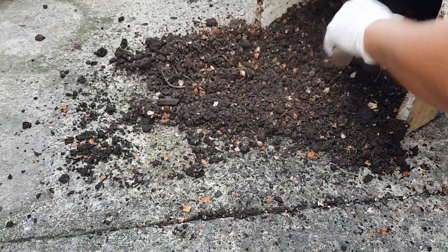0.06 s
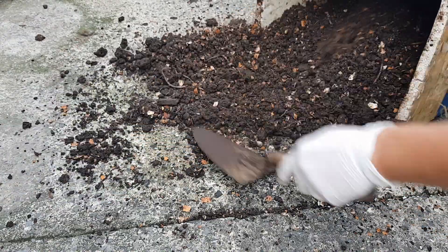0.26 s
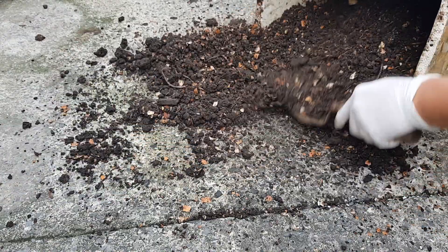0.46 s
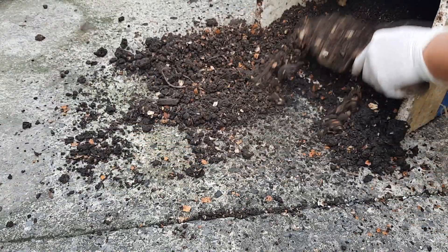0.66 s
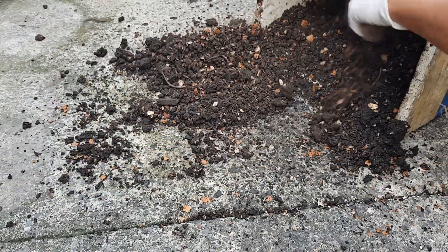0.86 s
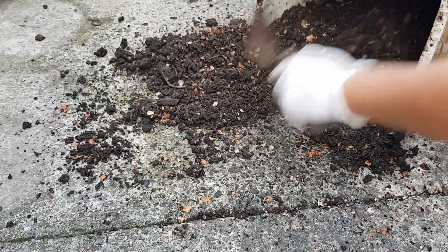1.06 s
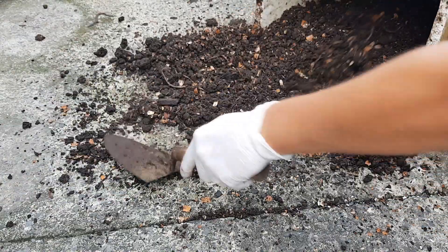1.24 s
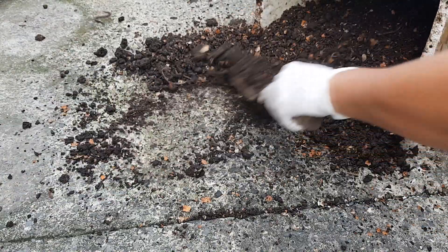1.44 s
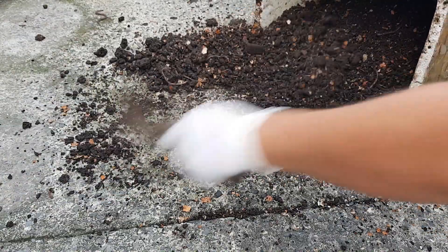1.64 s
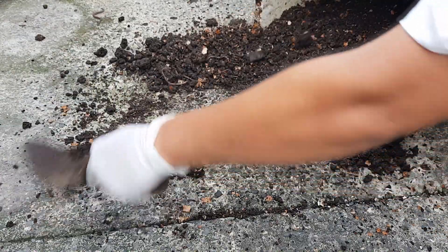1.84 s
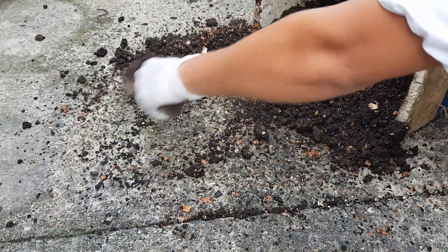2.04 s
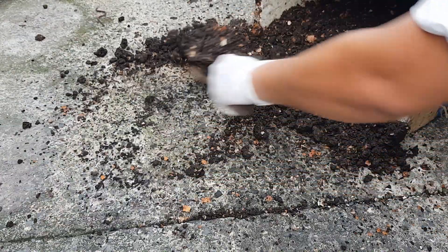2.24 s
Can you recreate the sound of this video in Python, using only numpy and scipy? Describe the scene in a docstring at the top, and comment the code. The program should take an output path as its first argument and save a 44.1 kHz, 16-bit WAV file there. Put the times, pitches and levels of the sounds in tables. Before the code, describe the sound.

Close up outdoors, a metal trowel makes three short, gritty scrapes across concrete, its blade ringing briefly. Scooped soil patters onto a heap slightly to the right, over a low rumble and a very faint distant bird.

```python
"""A small steel trowel scoops crumbly compost off a concrete floor in three strokes.
Grit crunches under the edge, which catches on stones and makes the blade ring. Each load is
tossed onto a heap at the right and lands in soft thuds and trickling crumbs. Hard bits click
on the floor and nearby walls echo, over a faint distant bird and a low outdoor rumble."""
import sys
import numpy as np
from scipy import signal
from scipy.fft import rfft, irfft, next_fast_len
from scipy.io import wavfile
from scipy.ndimage import uniform_filter1d, map_coordinates

SR = 44100
rng = np.random.default_rng(int(sys.argv[2]) if len(sys.argv) > 2 else 0)


def to_wav(sig):
    """Store sig (one row per channel, or 1-D mono) as 16-bit WAV at the path in sys.argv[1].

    Samples outside -1..1 are clipped; the rate is SR.
    """
    pcm = np.clip(np.atleast_2d(sig), -1, 1) * 32767
    pcm = np.round(pcm).astype(np.int16)
    wavfile.write(sys.argv[1], SR, pcm.T)  # frames by channels


N = 101429

# Levels are relative. Pan is left minus right, so a negative pan lies to the right.
# the edge scraping the concrete, one list per stroke (t/s, crunch level/dB, ring level/dB)
STROKES = [
    [(.32, -52, -79), (.341, -36, -33), (.346, -20.5, -24), (.356, -21.5, -23), (.367, -35, -49),
     (.373, -25.5, -22), (.386, -17, -18.5), (.4, -26.5, -25.5), (.414, -26.5, -15), (.43, -29, -42),
     (.475, -32, -47), (.53, -47, -47)],
    [(1.28, -42.5, -25.5), (1.298, -23.5, -26.5), (1.31, -39, -30), (1.321, -34, -20), (1.326, -25.5, -27),
     (1.352, -24.5, -21), (1.366, -24.5, -18.5), (1.381, -20, -24), (1.394, -24, -17.5),
     (1.42, -30.5, -27.5), (1.44, -37.5, -66), (1.47, -59, -74.5)],
    [(1.796, -36.5, -35), (1.818, -37, -34.5), (1.843, -29, -28.5), (1.864, -23, -18), (1.878, -44, -40),
     (1.898, -41.5, -39), (1.904, -29, -23), (1.943, -27, -25.5), (1.952, -20.5, -35), (1.966, -22, -27),
     (1.975, -50, -46), (1.989, -45, -29), (1.998, -24, -29), (2.04, -34, -29), (2.075, -42, -48),
     (2.14, -44, -57), (2.22, -45.5, -62), (2.3, -48.5, -81)],
]
# where each stroke lies (pan/dB, delay of the left ear/ms)
STROKE_PLACES = [(-3, .04), (-2, -.08), (-3.5, -.18)]
# the edge catches on a stone (t/s, crunch level/dB, ring level/dB, fade/s, pan/dB)
CATCHES = [(.217, -54, -39, 0.0064, -18), (.291, -49, -27, 0.021, -7), (0.3428, -21, -19.5, 0.02, -8),
           (0.369, -11, -26, 0.0093, -8), (.403, -12, -3, 0.015, -3.5), (0.426, -24.5, -39, 0.0065, -1.5),
           (.4385, -11.5, -37, 0.0082, -6), (0.4667, -15, -28, 0.012, -8), (1.2798, -21.5, -34, .012, -5.5),
           (1.294, -22.5, -35, 0.004, 4), (1.316, -42.5, -20, .01, 8.5), (1.324, -22, -47, 0.012, -2),
           (1.341, -19.5, -26, 0.014, -6), (1.3678, -13.5, -8.5, 0.0148, -6.5),
           (1.3899, -13.5, -15.5, 0.019, -5.5), (1.412, -19.5, -26, 0.042, -5),
           (1.7937, -33, -34, 0.011, -3.5), (1.858, -18, -26, 0.0057, 9), (1.903, -17, -24, 0.011, 3),
           (1.928, -17.5, -22, .012, 8), (1.946, -27.5, -32, 0.016, -13), (1.994, -23.5, -38, 0.019, -2),
           (2.042, -28, -32, 0.01, -0.5), (2.108, -27.5, -56, 0.05, -5), (2.162, -29, -57, 0.023, -7),
           (2.181, -35.5, -50, .015, 2), (2.205, -31.5, -49, .03, -2), (2.246, -31, -50, 0.026, -4)]
# the tones the blade rings with (f/Hz, level/dB, time to fade by 60 dB/s)
BLADE_TONES = [(1166, -17, 0.061), (1443, -7, 0.0083), (1639, -8, 0.037), (1659.5, -1.5, 0.059),
               (1730.4, 3, 0.037), (1870, -5, 0.015), (2160, -12.5, 0.063), (2333, -17, .05),
               (2953, -20.5, 0.086), (3630, -10.5, 0.032), (4090, -24, 0.047), (4586, -24.5, 0.09),
               (5400, -16, 0.052), (6715, -21, 0.075), (8870, -18, 0.081), (10050, -16, 0.049),
               (12710, -30.5, .025), (14790, -6, 0.0186)]
# tone colour of crunching grit (f/Hz, level/dB)
CRUNCH_COLOUR = [(100, -25.5), (330, -8), (700, -1), (1000, -5), (1400, 2), (2100, 1.5), (2850, 5.5),
                 (3280, -10), (3750, -1), (5000, -3.5), (6700, 0.5), (8000, -5), (10000, 3.5), (13500, 2),
                 (14800, -3.5), (16000, -7)]
# tossed clods land (t/s, thud level/dB, hiss level/dB, rise/s, fade/s)
CLODS = [(0.05, -31.5, -52, 0.0063, 0.2), (0.088, -39, -48, 0.016, 0.17),
         (0.226, -24.5, -62, 0.0044, 0.063), (0.594, -47, -48, 0.0041, 0.052),
         (0.718, -37.5, -43.5, 0.033, 0.038), (.888, -32, -46, 0.00095, 0.059),
         (.915, -28.5, -50, 0.0028, 0.093), (0.978, -45, -74, 0.012, 0.33),
         (1.158, -35, -47.5, 0.019, 0.071), (1.197, -41, -44, 0.024, 0.093)]
# tone colour of a clod's thud (f/Hz, level/dB)
THUD_COLOUR = [(60, -22.5), (130, 2), (200, -10.5), (255, 2.5), (320, -4), (420, -7), (570, -6.5),
               (750, -18), (1200, -26.5), (2500, -42), (6000, -58)]
# tone colour of falling crumbs (f/Hz, level/dB)
CRUMB_COLOUR = [(300, 16.5), (1000, 4.5), (1700, 3.5), (3000, -3.5), (6500, 0), (8000, -3.5), (11500, 2),
                (15000, -1.5), (16000, -8.5)]
# crumbs settling on the heap (t/s, level/dB)
TRICKLE = [(0, -52), (.2, -54.5), (.55, -52.5), (.68, -54.5), (0.951, -53.5), (1.14, -55.5), (1.5, -61.5),
           (1.7, -59.5), (2.3, -58)]
# stone, bark and trowel hit the floor (t/s, level/dB, centre f/Hz, fade/s)
TICKS = [(0.12, -24.5, 12840, .008), (0.2483, -26, 954, 0.014), (.249, -32.5, 3040, 0.0034),
         (0.405, -33, 690, .006), (.425, -38.5, 1000, 0.0092), (0.649, -45, 11060, .005),
         (1.194, -38.5, 1000, 0.0062), (1.278, -19, 1275, 0.013), (1.283, -24, 593, 0.0123),
         (1.654, -48, 11000, .005), (1.741, -42.5, 10960, 0.016), (1.767, -42, 8940, .008),
         (1.798, -30.5, 1250, 0.026), (1.796, -42.5, 500, 0.048), (2.109, -39.5, 2800, 0.037),
         (2.248, -33.5, 2500, 0.015)]
# a distant bird's whistles (t/s, length/s, start f/Hz, end f/Hz, level/dB)
WHISTLES = [(.8, 0.14, 4560, 3690, -58.5), (1.688, .1, 3180, 2420, -55.5)]
# tone colour of the outdoor rumble (f/Hz, level/dB)
RUMBLE_COLOUR = [(15, -43), (25, -32.5), (35, -21.5), (50, 2), (65, -0.5), (105, 2.5), (150, -5.5),
                 (220, -18.5), (400, -24), (800, -42), (2000, -51.5), (3000, -36), (8000, -60),
                 (16000, -57)]
# how long the yard echoes (f/Hz, time to fade by 60 dB/s)
ECHO_TIMES = [(200, 0.75), (1700, 0.26), (6000, 0.32), (15000, 0.43)]
# hard surfaces throw back mostly the highs (f/Hz, level/dB)
ECHO_COLOUR = [(60, -38), (250, -10.5), (800, 7.5), (2000, 4), (5000, 8), (16000, -5)]
# how the two microphones differ (f/Hz, pan/dB)
MIC_BALANCE = [(100, 0), (700, 0.5), (1400, 2), (2500, -3), (5000, 2.5), (9000, 2.5), (13000, 0),
               (16000, -14)]

JUDDERS_PER_S, CONTACT_MOVES_PER_S = 190, 22
HIT_RISE_S, RING_RISE_S = 0.00031, 0.0004


def scrapes(ring_db=-2, ring_pan_db=-2.5, grit_judder_db=3.2, ring_judder_db=1.5):
    """Grit breaks under the juddering edge and rings the blade; the ring shifts as the contact moves."""
    out = np.zeros((2, N))
    for stroke, (pan_db, lag_ms) in zip(STROKES, STROKE_PLACES):
        times, crunch_db, blade_db = np.transpose(stroke)
        grit = steady(grains(per_s=3500, spread_db=5, lag_ms=lag_ms))
        grit *= unit(amp(grit_judder_db * wobble(JUDDERS_PER_S)))
        ring = steady(sum(through(grit * wobble(CONTACT_MOVES_PER_S), blade_ring()) for _ in range(3)))
        ring *= unit(amp(ring_judder_db * wobble(JUDDERS_PER_S)))
        ring *= swell(times, blade_db + ring_db)
        crunch = through(patchy(grit) * swell(times, crunch_db), colour(CRUNCH_COLOUR))
        out += yard(crunch * pan(pan_db) + ring * pan(ring_pan_db))
    return out


def catches(tap_offset_db=-2, bright_db=-9):
    """A stone stops the edge, then gives way: a dull tap, and a spurt of grit that rings high tones."""
    force, taps = np.zeros((2, N)), np.zeros((2, N + SR))
    for start, crunch_db, tap_db, fade, pan_db in CATCHES:
        force += amp(crunch_db) * burst(start, HIT_RISE_S, fade) * pan(pan_db)
        tap = blade_ring(tilt_db=-6, detune_hz=4.2)
        tap *= amp(tap_db + tap_offset_db) / np.abs(tap).max()
        at = round(start * SR)
        taps[:, at:at + len(tap)] += tap * pan(pan_db / 2)
    spurts = force * patchy(grains(per_s=20000, spread_db=3))
    bright_ring = amp(bright_db) * through(spurts, blade_ring(tilt_db=4.5))
    return through(spurts, colour(CRUNCH_COLOUR)) + bright_ring + taps[:, :N]


def blade_ring(tilt_db=0, detune_hz=20, scatter_db=1):
    """One tap rings the steel; each tone gains tilt_db per octave away from the strongest one."""
    t = np.arange(SR // 8) / SR
    main_hz = max(BLADE_TONES, key=lambda tone: tone[1])[0]
    ring = np.zeros(len(t))
    for k, (hz, db, ring_s) in enumerate(BLADE_TONES):
        level = amp(db + tilt_db * abs(np.log2(hz / main_hz)) + scatter_db * rng.normal())
        shifted_hz = hz + detune_hz * rng.normal()  # grip and pressure shift each tone
        ring += level * amp(-60 * t / ring_s) * np.cos(2 * np.pi * shifted_hz * t + k * np.pi / 2)
    ring *= 1 - np.exp(-t / RING_RISE_S)
    return ring / np.linalg.norm(ring)


def heap(thud_pan_db=-4.5, crumb_pan_db=-10):
    """Clods patter down with dull thuds while fine crumbs hiss and trickle."""
    thud = sum(amp(db) * burst(start, rise, fade) for start, db, _, rise, fade in CLODS)
    hiss = sum(amp(db) * burst(start, rise, fade) for start, _, db, rise, fade in CLODS)
    trickle = amp(np.interp(clock(), *np.transpose(TRICKLE)))
    clods = through(thud * steady(grains(per_s=1500, spread_db=3)), colour(THUD_COLOUR))
    crumbs = through(np.hypot(hiss, trickle) * grains(per_s=7000, spread_db=4.7), colour(CRUMB_COLOUR))
    return clods * pan(thud_pan_db) + crumbs * pan(crumb_pan_db)


def ticks(pan_db=-4, width_octaves=0.38):
    """Each hard hit on the floor makes a short click around one pitch."""
    out = np.zeros((2, N))
    for start, db, hz, fade in TICKS:
        band = [(hz * 2 ** (k * width_octaves), -10 * np.log10(1 + k ** 4)) for k in range(-8, 9)]
        click = burst(start, HIT_RISE_S, fade) * grains(per_s=14000, spread_db=3)
        out += amp(db) * through(click, colour(band))
    return out * pan(pan_db)


def bird(blur_hz=200):
    """A far bird's falling whistles, blurred by distance."""
    out = np.zeros((2, N))
    for start, length, start_hz, end_hz, db in WHISTLES:
        progress = np.clip((clock() - start) / length, 0, 1)
        blur = blur_hz * np.array([wobble(500), wobble(400)])
        hz = end_hz + (start_hz - end_hz) * (1 - progress) ** 2 + blur
        out += amp(db) * np.sin(np.pi * progress) * np.sin(2 * np.pi * np.cumsum(hz, axis=1) / SR)
    return out


def yard(x, echo_db=0, tail_db=-19.5, walls_db=-8, walls_s=0.016):
    """Adds quick echoes from the floor and walls, then a short, smooth tail."""
    hz, t, spectrum = signal.stft(rng.standard_normal((2, SR // 2)), SR, nperseg=256)
    fading = amp(-60 * t / along(ECHO_TIMES, hz)[:, None])
    tail = signal.istft(spectrum * fading, SR, nperseg=256)[1]
    t = np.arange(tail.shape[1]) / SR
    tail *= np.minimum(t / 0.03, 1)  # builds up over 30 ms
    tail /= np.linalg.norm(tail[0])
    walls = rng.standard_normal(tail.shape) * (rng.random(tail.shape) < .03)  # scattered single echoes
    walls *= np.exp(-2 * t / walls_s)
    walls /= np.linalg.norm(walls, axis=1, keepdims=True)
    echo = through(x, amp(tail_db) * tail + amp(walls_db) * walls)
    return x + amp(echo_db) * through(echo, colour(ECHO_COLOUR))


def rumble(level_db=-41.5, side_db=-19.5):
    """Distant outdoor rumble, nearly the same in both ears."""
    middle, side = through(rng.standard_normal((2, N)), colour(RUMBLE_COLOUR))
    side *= amp(side_db)
    return amp(level_db) * np.array([middle + side, middle - side])


def grains(per_s, spread_db, lag_ms=0, scatter_ms=.04):
    """A stream of tiny random hits; each reaches the two ears at slightly different times."""
    chance, size, side = rng.random(N), rng.standard_normal(N), rng.standard_normal(N)
    at = np.flatnonzero(chance < per_s / SR)
    hits = amp(spread_db * np.clip(size, -2, 2)) * rng.choice([-1, 1], N)
    lag = (lag_ms + scatter_ms * side[at]) * SR / 1000
    arrivals = [np.round(at + ear * lag / 2).astype(int) % N for ear in (1, -1)]
    return unit(np.array([np.bincount(when, hits[at], N) for when in arrivals]))


def patchy(x, depth_db=3):
    """Gives each breaking crumb a tone colour of its own."""
    spectrum = signal.stft(x, nperseg=128)[2]
    patches = uniform_filter1d(rng.standard_normal(spectrum.shape[1:]), size=5, axis=0)  # across pitch
    patches = unit(uniform_filter1d(patches, size=6, axis=1))  # across time
    return signal.istft(spectrum * unit(amp(depth_db * patches)), nperseg=128)[1][:, :N]


def steady(x, window_s=0.014):
    """Evens out slow swells, so the level stays near 1."""
    power = uniform_filter1d(np.mean(x ** 2, axis=0), int(window_s * SR))
    return x / np.sqrt(np.abs(power) + 1e-12)


def burst(start, rise, fade):
    """Rises to 1, then falls by 40 dB over each fade time."""
    t = clock() - start
    return np.clip(t / rise, 0, 1) * amp(-40 * np.maximum(t - rise, 0) / fade)


def swell(times, db):
    """A loudness curve through the points, silent before and after."""
    return amp(np.interp(clock(), times, db, left=-np.inf, right=-np.inf))


def wobble(per_s):
    """A smooth curve through per_s random values a second."""
    return map_coordinates(rng.standard_normal(N // 8), [clock() * per_s], mode="wrap")


def colour(points, size=8192):
    """A click of energy 1 with the given tone colour, for use as a filter."""
    gains = amp(along(points, np.fft.rfftfreq(size, 1 / SR)))
    shape = irfft(np.log(gains))
    # folding the second half onto the first packs the energy at the click's start
    shape[1:size // 2] *= 2
    shape[size // 2 + 1:] = 0
    click = irfft(np.exp(rfft(shape)))
    return click / np.linalg.norm(click)


def through(x, response):
    """Filters stereo x: every sample sets off a copy of the response."""
    return signal.fftconvolve(x, np.atleast_2d(response), axes=1)[:, :N]


def along(points, hz):
    """Reads between (f/Hz, value) points on a scale of octaves."""
    point_hz, values = np.transpose(points)
    return np.interp(np.log(hz + 1), np.log(point_hz + 1), values)


def pan(db):
    """Left and right gains, db apart."""
    return amp(np.array([[db / 2], [-db / 2]]))


def amp(db):
    """Turns decibels into a gain."""
    return 10 ** (np.asarray(db) / 20)


def unit(x):
    """Scales x to an average power of 1."""
    return x / np.sqrt(np.mean(x ** 2) + 1e-20)


def clock():
    """Each sample's time in seconds."""
    return np.arange(N) / SR


def scene():
    """Trowel, heap and bird in the yard, over the rumble."""
    return scrapes() + yard(catches(), echo_db=-3.5) + yard(heap() + ticks() + bird()) + rumble()


def record(dry, top_hz=15900):
    """Two unlike microphones; peaks are cut at full scale, then all above top_hz is removed."""
    size = next_fast_len(N + SR // 4)
    hz = np.fft.rfftfreq(size, 1 / SR)
    mic_gains = amp(along(MIC_BALANCE, hz) * np.array([[.5], [-.5]]))
    heard = np.clip(irfft(rfft(dry, size) * mic_gains, size), -1, 1)
    return irfft(rfft(heard) * (hz < top_hz), size)[:, :N]


dry = scene()
out = record(dry)
to_wav(out)
```